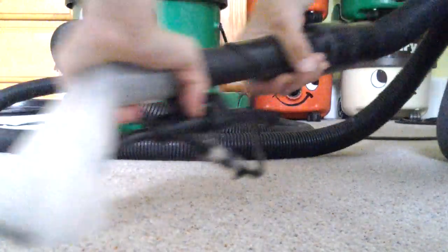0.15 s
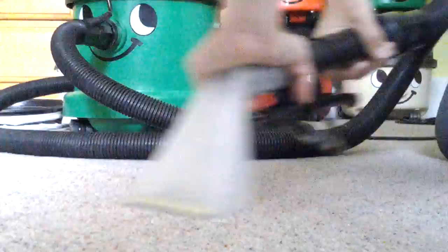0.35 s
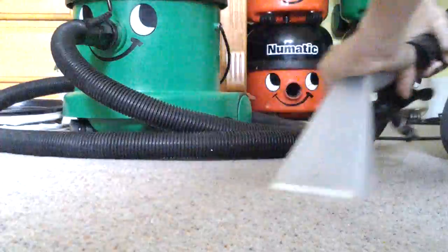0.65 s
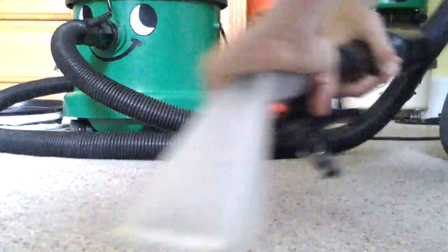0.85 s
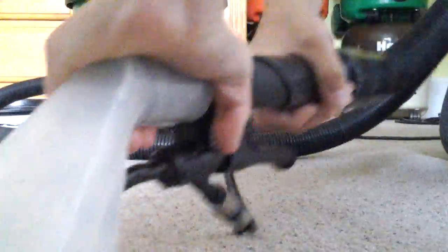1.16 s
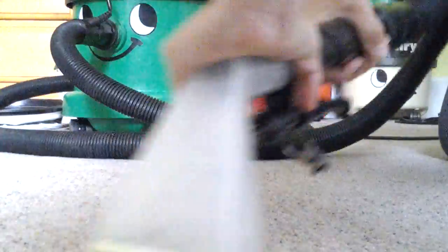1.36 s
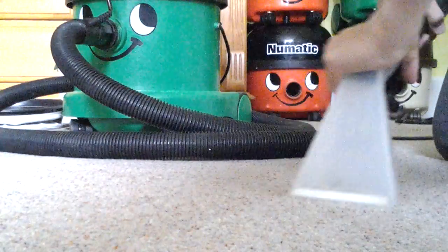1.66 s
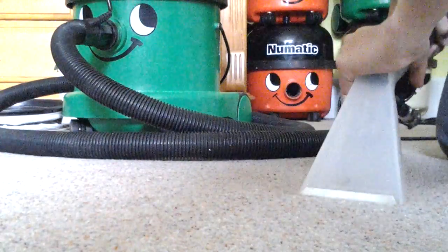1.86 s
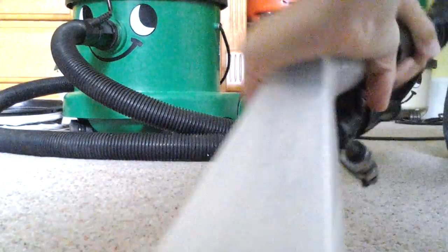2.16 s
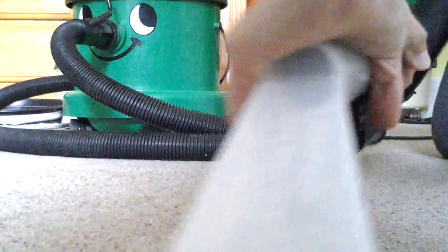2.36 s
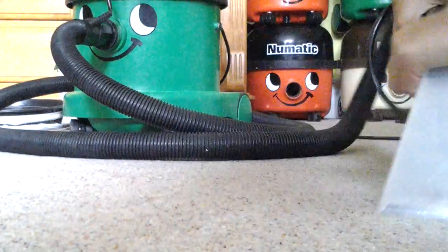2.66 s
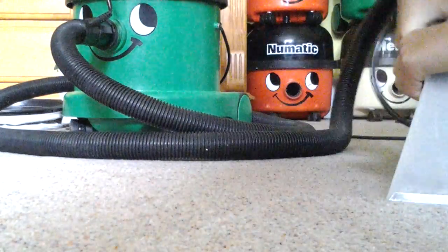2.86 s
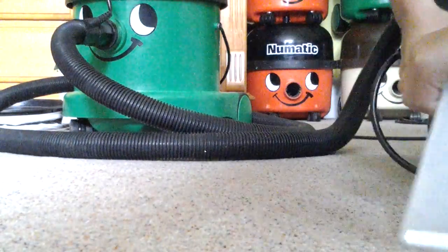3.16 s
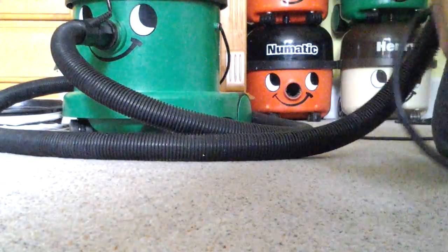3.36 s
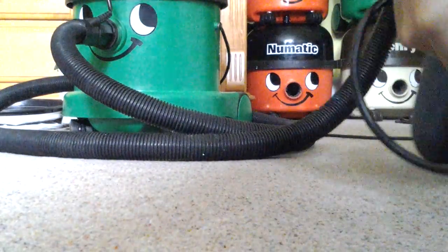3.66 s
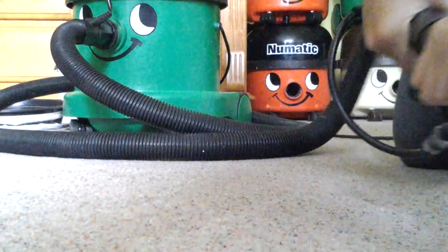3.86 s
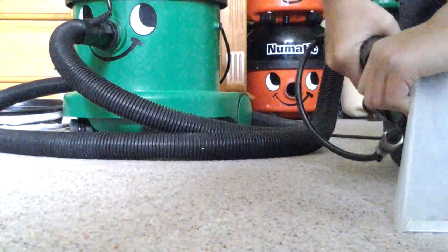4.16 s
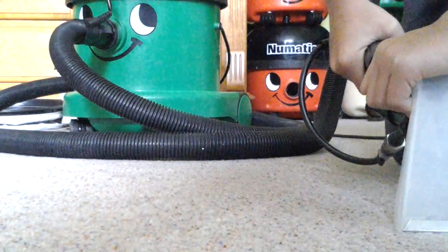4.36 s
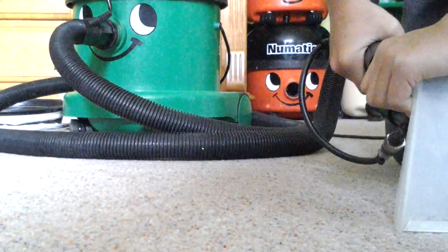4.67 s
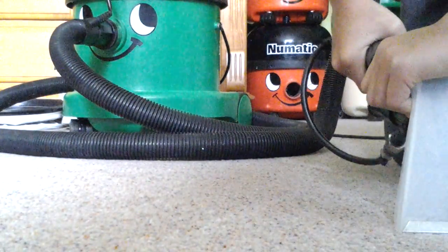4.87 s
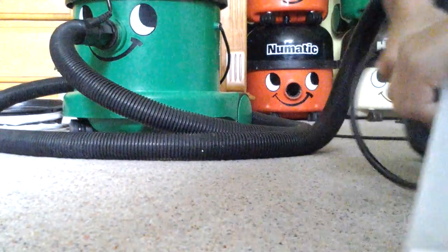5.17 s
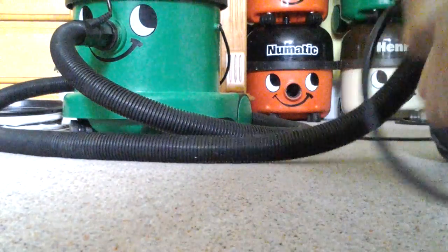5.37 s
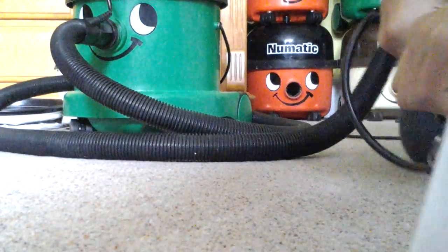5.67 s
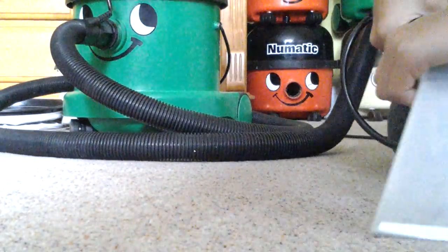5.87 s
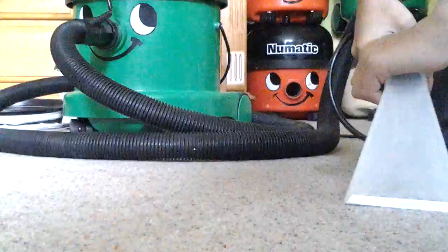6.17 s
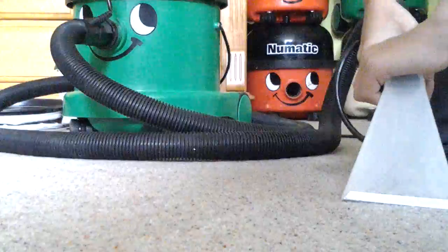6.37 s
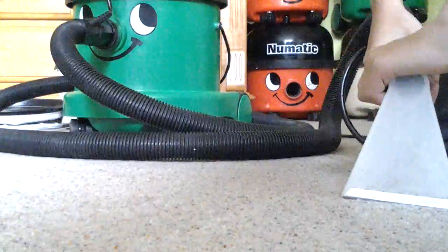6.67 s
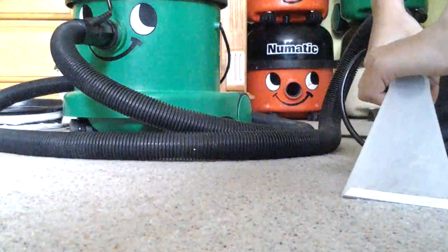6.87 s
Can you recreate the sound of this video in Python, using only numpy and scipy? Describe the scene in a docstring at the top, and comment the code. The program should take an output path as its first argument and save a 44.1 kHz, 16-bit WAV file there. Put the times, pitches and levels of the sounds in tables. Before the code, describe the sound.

A wet-and-dry vacuum cleaner runs close by in a carpeted room for the whole seven seconds. A steady mid-pitched hum and a high, fluttering whine sit within a bright rush of air, with thin whistles from the hose. The motor's pitch rises and sags slightly as the load changes. Beneath it, the nozzle is dragged back and forth over the carpet, each stroke a soft swish with a low rumble and a faint sipping of water. Strokes come often from the start until about 4 seconds, with small, quiet groans as the edge sticks and slips. One short wet slurp sounds at about 1.2 seconds. The strokes lighten between 4 and 5 seconds, return more firmly from 5.2 to 6, then become tiny brushes. The whine swells briefly around 2.9, 5.3 and most strongly 6.7 seconds, and the motor is still running at the end.

```python
"""A carpeted room, where a wet-and-dry vacuum cleaner runs and its nozzle is dragged to and fro close by.
The shaft hums and the twelve-blade impeller whines, their pitch moving with the load, while air rushes
and whistles through hose and drum. Under that, the nozzle rumbles over the pile at each stroke, brushes
the fibres and groans as its lip sticks and slips. It sips water and once gives a short slurp."""
import sys
import numpy as np
from scipy import signal
from scipy.fft import rfft, irfft
from scipy.io import wavfile
from scipy.ndimage import uniform_filter1d, minimum_filter1d

SR = 44100
rng = np.random.default_rng(int(sys.argv[2]) if len(sys.argv) > 2 else 0)


def unload_audio(sound):
    """Save the sound as a 16-bit wav file, at the path given as the first command line argument."""
    columns = np.transpose(np.atleast_2d(sound))
    # keep every value between -1 and 1, then stretch to whole-number steps
    steps = np.round(np.clip(columns, -1, 1) * 32767)
    wavfile.write(sys.argv[1], SR, steps.astype(np.int16))


N = 309141
TIME = np.arange(N) / SR
FREQ = np.maximum(np.fft.rfftfreq(N, 1 / SR), 1)


def undb(db):
    """Decibels to gain."""
    return 10 ** (np.asarray(db) / 20)


def unit(x):
    """Scale to rms 1."""
    return x / np.sqrt(np.mean(x ** 2))


def eq_curve(points):
    """An EQ curve in dB, joining (Hz, dB) points on a log-frequency axis."""
    hz, db = np.transpose(points)
    return np.interp(np.log(FREQ), np.log(hz), db)


def colour(x, db):
    """Filter by an EQ curve in dB; rms 1."""
    return unit(irfft(rfft(x) * undb(db), N))


def wander(rate_hz):
    """Smooth random modulation of rms 1, moving at up to about rate_hz."""
    return colour(rng.standard_normal(N), -10 * np.log10(1 + (FREQ / rate_hz) ** 4))


def bumps(rows):
    """Bell-shaped lifts and dips of level, in dB."""
    return sum(db * np.exp(-((TIME - middle) / half) ** 2) for middle, half, db in rows)


# The tone colour of water tearing in the nozzle. Each row: frequency in Hz, level in dB.
WATER_EQ = [(100, -48), (400, -13.5), (700, -5), (1100, -11.5), (1450, -6), (2100, -5), (3200, -17),
            (5000, -29), (10000, -48)]

def spray(per_second, scatter_db):
    """Droplets strike inside the nozzle at random moments and in very unequal sizes."""
    hits = rng.random(N) < per_second / SR
    drops = hits * rng.standard_normal(N)
    size_db = scatter_db * np.minimum(rng.exponential(size=N), 2)
    return colour(drops * undb(size_db), eq_curve(WATER_EQ))


# The bursts of one slurp. Each row: peak time, rise and fall in seconds, level in dB.
SLURP_BURSTS = [(1.194, 0.005, 0.01, -21), (1.241, 0.007, 0.005, -16), (1.2565, 0.005, 0.005, -10.5),
                (1.27, 0.004, 0.009, -14.5), (1.318, 0.003, 0.007, -23)]

def slurp():
    """A gulp of water breaks into spray inside the nozzle."""
    envelope = 0
    for peak, rise, fall, db in SLURP_BURSTS:
        width = np.where(TIME < peak, rise, fall)
        envelope += undb(db) * np.exp(-.5 * ((TIME - peak) / width) ** 2)
    return envelope * spray(per_second=3000, scatter_db=1)


# Groans of the lip. Each row: start and length in seconds, first and last pitch in Hz, level in dB.
LIP_GROANS = [(0.74, 0.091, 139.4, 278, -33), (0.824, 0.081, 275, 295, -35), (0.93, 0.074, 315, 335, -31),
              (0.957, 0.135, 231, 220, -37), (1.452, 0.095, 193, 212, -30), (2.072, 0.09, 317, 310, -35),
              (2.163, 0.072, 222, 230, -32.5), (2.486, 0.14, 178, 196, -37), (2.67, 0.05, 690, 655, -24),
              (2.737, 0.054, 325, 360, -33), (3.154, 0.09, 216, 225, -38), (4.15, 0.07, 675, 685, -27),
              (5.348, 0.045, 134, 120, -41), (5.76, 0.079, 145, 135, -49)]

def lip_groans(jitter=0.048, overtone_db=-10):
    """The lip sticks and slips: short, rough tones whose pitch follows the speed of the stroke."""
    out = 0
    unevenness = 1 + jitter * wander(57)
    for start, length, first_hz, last_hz, db in LIP_GROANS:
        progress = np.clip((TIME - start) / length, 0, 1)
        pitch = (first_hz + (last_hz - first_hz) * progress) * unevenness
        phase = 2 * np.pi * np.cumsum(pitch) / SR
        slips = unit(np.sin(phase) + undb(overtone_db) * np.sin(2 * phase))
        out += undb(db) * np.sin(np.pi * progress) * slips
    return out


# Strokes over the carpet. Each row: start and length in seconds, rubbing and brushing levels in dB.
NOZZLE_STROKES = [(0.16, 0.25, -40, -32), (0.444, 0.16, -32.5, -35), (0.753, 0.16, -32, -31),
                  (0.92, 0.2, -31.5, -31), (1.288, 0.337, -35.5, -26.5), (1.977, 0.34, -30.5, -28),
                  (2.44, 0.35, -34.5, -27.5), (3.125, 0.13, -31.5, -33), (3.277, 0.21, -38, -29.5),
                  (3.783, 0.21, -39.5, -30.5), (4.04, 0.06, -48, -35), (4.53, 0.04, -41, -38),
                  (4.656, 0.1, -43, -36), (4.986, 0.034, -46, -40), (5.183, 0.18, -33.5, -27),
                  (5.458, 0.28, -44, -30), (5.75, 0.21, -39, -35), (6.113, 0.04, -44, -37),
                  (6.294, 0.04, -45, -38), (6.43, 0.05, -44, -33), (6.56, 0.04, -44, -35)]

def stroke_envelopes(attack_s=0.038, release_s=0.035, sag_db_per_s=10):
    """Gains for rubbing and brushing: each stroke bites, eases off and dies away."""
    rubbing, brushing = 0, 0
    for start, length, rub_db, brush_db in NOZZLE_STROKES:
        age = np.maximum(TIME - start, 0)
        attack = np.minimum(age / attack_s, 1)
        release = np.exp(-np.maximum(age - length, 0) / release_s)
        envelope = undb(-sag_db_per_s * age) * attack * release
        rubbing += undb(rub_db) * envelope
        brushing += undb(brush_db) * envelope
    return rubbing, brushing


# The faint low rumble between strokes swells or drops away.
# Each row: middle and half length in seconds, lift or dip in dB.
RUMBLE_RIDES = [(1.85, .1, 5), (2.98, 0.073, 0), (4.97, 0.25, -25), (6.8, 0.065, -6)]
# The low rumble of the lip bumping over the pile. Each row: frequency in Hz, level in dB.
PILE_EQ = [(30, -8), (80, -22), (120, -17.5), (160, -7), (195, 2), (270, -2.5), (340, -1), (500, -1),
           (1000, -27), (3000, -58)]
# The midrange swish of fibres on the lip. Each row: frequency in Hz, level in dB.
FIBRE_EQ = [(150, -44), (450, 0.5), (750, 6.5), (1300, 3), (2500, -14), (6000, -38)]

def nozzle(creep_db=-53, creep_wander_db=6, judder_db=0.5, sip_db=-6):
    """On each stroke the lip judders over the pile, brushes fibres and lifts water; between, it creeps."""
    rubbing, brushing = stroke_envelopes()
    creep = undb(creep_db + bumps(RUMBLE_RIDES) + creep_wander_db * wander(8.4))
    rumble = colour(rng.standard_normal(N), eq_curve(PILE_EQ)) * undb(judder_db * wander(29))
    swish = colour(rng.standard_normal(N), eq_curve(FIBRE_EQ))
    sip = undb(sip_db) * spray(per_second=1800, scatter_db=1.5)
    return np.hypot(rubbing, creep) * rumble + brushing * (swish + sip)


# Two thin whistles. Each row: pitch in Hz, bandwidth in Hz, level in dB.
HOSE_WHISTLES = [(2488, 26, -34.7), (4255, 14, -32.5)]

def hose_whistles(drift_hz=5, swell_db=3.0, swell_hz=5):
    """Eddies in the hose sing at narrow resonances that drift, flare up and sink back into the hiss."""
    out = 0
    for hz, width_hz, db in HOSE_WHISTLES:
        phase = 2 * np.pi * np.cumsum(hz + drift_hz * wander(2)) / SR
        ringing = wander(width_hz / 2) * np.cos(phase) + wander(width_hz / 2) * np.sin(phase)
        out += undb(db + swell_db * wander(swell_hz)) * ringing
    return out


# The broad, bright rush of air. Each row: frequency in Hz, level in dB.
AIR_EQ = [(130, -71), (215, -30), (275, -22.5), (330, -16.5), (520, -17), (690, -9.5), (1050, -14),
          (1650, -15), (2200, -10.5), (2900, -13.5), (4000, -7), (4850, -3.5), (5020, 0), (5300, -7),
          (5750, -13), (6500, -16.5), (9500, -21), (10300, -22), (11600, -33)]
# Standing waves of hose and drum. Each row: centre in Hz, width in Hz, lift or dip in dB.
STANDING_WAVES = [(662, 17, 4.5), (797, 22, 3), (848, 16, 3), (980, 32, -2.5), (1160, 17, 6.5),
                  (1426, 18, 7.5), (1760, 40, 5.5), (2110, 45, 4.5), (2405, 20, -4), (2460, 36, 7.5),
                  (2595, 16, 3.5), (2755, 22, 3.5), (2895, 30, 5), (3011, 14, 5), (3326, 24, 7),
                  (3463, 15, 4.5), (3652, 20, 7.5), (3948, 22, 5.5), (4099, 24, -4), (4253, 24, 5),
                  (4340, 30, 5), (4581, 22, 6), (4655, 45, -4), (4710, 30, 6), (4829, 16, 6), (4925, 45, 3),
                  (4997, 30, 3), (5202, 18, 6.5), (5461, 32, 5.5), (5764, 28, 4), (6005, 26, 7.5),
                  (6135, 70, 3.5), (7500, 52, 6)]

def airflow(overspeed_hz, cruise_db=-14, db_per_hz=0.15, flicker_db=0.43):
    """Turbulence rings the standing waves of hose and drum, a little louder as the motor speeds up."""
    resonance_db = sum(db / (1 + (2 * (FREQ - hz) / width) ** 2) for hz, width, db in STANDING_WAVES)
    rush = colour(rng.standard_normal(N), eq_curve(AIR_EQ) + resonance_db)
    return rush * undb(cruise_db + db_per_hz * overspeed_hz + flicker_db * wander(8.5))


def rotor_tone(cycles, flutter, eddy_hz=65, sway_hz=14, sway_rad=0.12):
    """Turbulent inflow makes a rotor tone flutter, and its phase sways on the way out of the drum."""
    phase = 2 * np.pi * cycles + sway_rad * wander(sway_hz)
    steady = np.sqrt(2 * (1 - flutter ** 2))
    in_phase = steady + flutter * wander(eddy_hz)
    quadrature = flutter * wander(eddy_hz)
    return in_phase * np.cos(phase) + quadrature * np.sin(phase)


# Faint motor tones. Each row: multiple of the shaft rate, level in dB, flutter from 0 to 1.
SHAFT_OVERTONES = [(2, -42.5, 0), (3, -46, 0), (6, -35, 0.5), (18, -52, 0.8), (22, -49.5, 0.35),
                   (24, -38.5, 0.6)]

def motor_overtones(turns):
    """Weaker tones ride on the same shaft, some clean and some fluttering."""
    return sum(undb(db) * rotor_tone(multiple * turns, flutter)
               for multiple, db, flutter in SHAFT_OVERTONES)


# The whine swells or fades. Each row: middle and half length in seconds, lift or dip in dB.
WHINE_RIDES = [(0.12, 0.06, 1.2), (0.54, 0.041, -5.0), (1.0, 0.03, -5), (1.14, 0.03, -7.5),
               (1.49, 0.051, -5.3), (1.65, 0.04, 2.5), (1.92, 0.037, 5.5), (2.19, 0.06, -6.8),
               (2.39, 0.083, -7.2), (2.68, 0.07, 3.2), (2.86, 0.09, 5), (3.03, 0.025, -5), (3.14, 0.03, -5),
               (3.7, 0.041, -7.3), (3.92, 0.13, 2.6), (4.14, 0.035, 5.5), (4.27, 0.02, -6), (4.35, 0.05, 2),
               (4.47, 0.033, -8.5), (4.63, 0.025, -7.5), (4.8, 0.1, 1.2), (5.0, 0.035, -6),
               (5.16, 0.03, -5), (5.26, 0.03, 7.3), (5.38, 0.025, -8.5), (5.54, 0.03, 2.1),
               (5.68, 0.027, -8.5), (6.2, 0.182, 4), (6.53, 0.073, -5.3), (6.66, 0.06, 9.7)]

def impeller_whine(turns, shaft_hz, blades=12, level_db=-20, wander_db=1):
    """The passing blades whine, fading as their pitch crosses a null between the drum's standing waves."""
    null_shaft_hz, null_half_width_hz, null_db = 419.8, 1.2, -1.5
    dip_db = null_db * np.exp(-((shaft_hz - null_shaft_hz) / null_half_width_hz) ** 2)
    whine = rotor_tone(blades * turns, flutter=0.45, eddy_hz=42)
    return whine * undb(level_db + dip_db + bumps(WHINE_RIDES) + wander_db * wander(26))


# The hum sinks a little for a while. Each row: middle and half length in seconds, dip in dB.
HUM_RIDES = [(1.35, 0.25, -1.1), (4.75, 1, -2), (5.28, 0.071, -1.5)]

def shaft_hum(turns, overspeed_hz, cruise_db=-17.5, db_per_hz=-0.32, wander_db=0.54):
    """A clean hum, one cycle to each turn of the shaft, that weakens as the motor speeds up."""
    level_db = cruise_db + db_per_hz * overspeed_hz + bumps(HUM_RIDES) + wander_db * wander(12)
    return undb(level_db) * unit(np.sin(2 * np.pi * turns))


# The motor's pitch line. Each row: time in seconds, shaft rate in Hz.
SHAFT_SPEED = [(0.0, 423.9), (0.26, 418.1), (0.55, 417.6), (0.74, 416.1), (0.97, 419.3), (1.17, 420.3),
               (1.45, 412.8), (1.94, 416.9), (2.12, 420.2), (2.41, 420.1), (2.66, 416.5), (2.94, 416.5),
               (3.23, 423.0), (3.63, 420.2), (4.05, 415.8), (4.5, 420.7), (5.19, 423.7), (5.38, 421.1),
               (5.55, 420.7), (6.02, 415.7), (6.45, 419.1), (7.01, 416.3)]

def shaft_motion(wobble=0.00042):
    """Shaft rate and turns made: the motor races as carpet chokes the nozzle and slows as air gets in."""
    shaft_hz = np.interp(TIME, *np.transpose(SHAFT_SPEED))
    turns = np.cumsum(shaft_hz * (1 + wobble * wander(13.7))) / SR
    return shaft_hz, turns


def scene(cruise_hz=419.0):
    """Motor and air up front with the nozzle beneath them, mixed in mono."""
    shaft_hz, turns = shaft_motion()
    overspeed_hz = shaft_hz - cruise_hz
    motor = shaft_hum(turns, overspeed_hz) + impeller_whine(turns, shaft_hz) + motor_overtones(turns)
    return (motor + airflow(overspeed_hz) + hose_whistles() + nozzle() + lip_groans() + slurp())[None]


def record(dry, ceiling=0.97, low_cut_hz=115, high_cut_hz=12800):
    """A quick limiter holds down the peaks, then filters trim the bass and the top."""
    needed_gain = ceiling / np.maximum(np.abs(dry), ceiling)
    gain = uniform_filter1d(minimum_filter1d(needed_gain, size=161), size=161)
    low_cut = signal.butter(2, low_cut_hz, "high", fs=SR, output="sos")
    high_cut = signal.ellip(8, .2, 70, high_cut_hz, fs=SR, output="sos")
    return signal.sosfilt(high_cut, signal.sosfilt(low_cut, dry * gain))


dry = scene()
out = record(dry)
unload_audio(out)
```